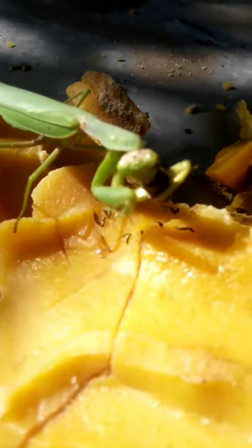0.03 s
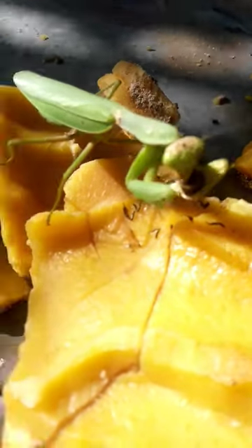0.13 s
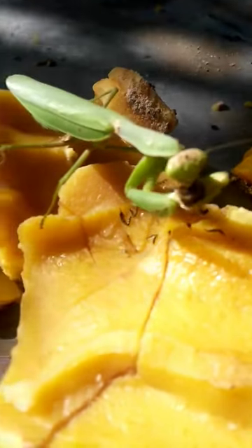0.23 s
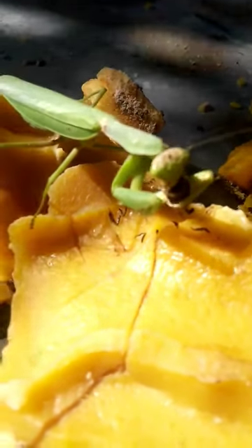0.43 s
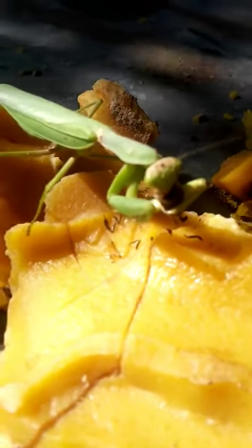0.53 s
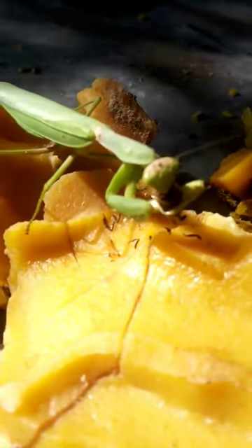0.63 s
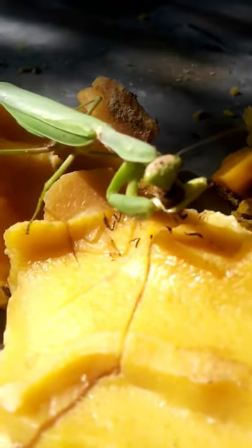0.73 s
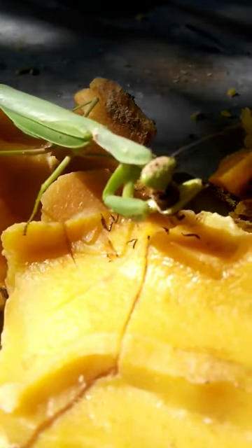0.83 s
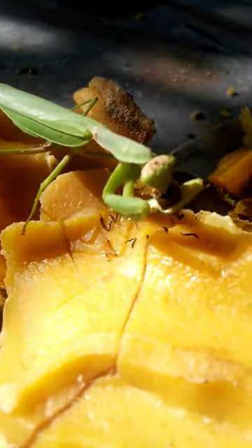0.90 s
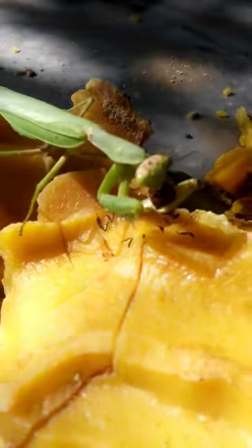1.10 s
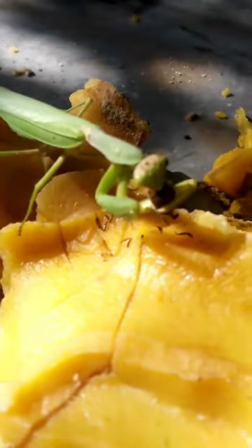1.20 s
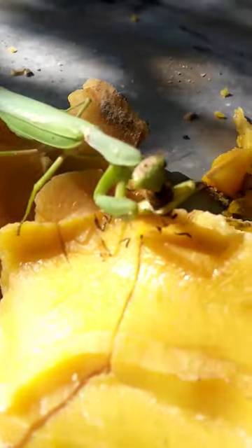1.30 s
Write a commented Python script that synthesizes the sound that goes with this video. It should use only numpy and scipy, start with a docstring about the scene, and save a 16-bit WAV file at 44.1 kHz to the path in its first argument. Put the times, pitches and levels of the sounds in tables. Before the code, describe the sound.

A short, close clack comes from a camera being handled outdoors, just after a soft bump. Faint ticks, a finger's slide and dull rubs of the grip follow, with quiet hiss and rumbling air throughout.

```python
"""A quiet outdoor hiss and a low rumble of moving air are heard from start to end.
At about 0.1 s a hand bumps and rubs softly on the camera it holds.
From 0.21 s three quick blows, close by, make the camera's case ring with a clack.
A finger then slides over the case with a thin hiss and, near 0.4 s, a few tiny ticks.
More soft bumps and rubs of the grip follow until about 1.3 s."""
import sys
import numpy as np
from scipy import signal
from scipy.fft import rfft, irfft
from scipy.io import wavfile

SR = 44100
rng = np.random.default_rng(int(sys.argv[2]) if len(sys.argv) > 2 else 0)


def dump(signal):
    """Clip the signal to [-1, 1] and save it as 16-bit WAV at the path in sys.argv[1]."""
    limited = np.clip(np.atleast_2d(signal).T, -1, 1)
    pcm = np.round(limited * 32767).astype(np.int16)
    wavfile.write(sys.argv[1], SR, pcm)


N = 59535
EDGE_HZ = 14350  # upper edge of the sound


def amp(db):
    """Turns decibels into a gain."""
    return 10 ** (np.asarray(db) / 20)


def unit(x):
    """Scales a signal to an average strength (rms) of 1."""
    return x / np.sqrt(np.mean(x ** 2) + 1e-20)


def read(points, hz):
    """Looks up a frequency in a table, blending between rows on a log scale."""
    f, value = np.transpose(points)
    return np.interp(np.log(hz + 1), np.log(f + 1), value)


def level(points):
    """Gain over time from a (t/s, level/dB) table."""
    return amp(np.interp(np.arange(N) / SR, *np.transpose(points)))


def add(mix, start, sound):
    """Mixes a sound in at a start time in seconds."""
    part = mix[round(start * SR):][:len(sound)]
    part += sound[:len(part)]


def noise(colour, low_hz=4):
    """Noise of rms 1 with the given colour (level at each frequency), fading below low_hz."""
    hz = np.fft.rfftfreq(N, 1 / SR)
    gain = amp(read(colour, hz)) * hz ** 2 / (hz ** 2 + low_hz ** 2)
    return unit(irfft(gain * np.exp(2j * np.pi * rng.random(len(hz))), N))


def coloured(x, colour):
    """Filters a signal by a (f/Hz, level/dB) table."""
    return irfft(rfft(x) * amp(read(colour, np.fft.rfftfreq(N, 1 / SR))), N)


def swell(t, rise, steepness=1.7):
    """Smooth build-up from 0 to 1."""
    return 1 - np.exp(-(t / rise) ** steepness)


# Colour of the outdoor hiss (f/Hz, relative level/dB) and its loudness (t/s, level/dB)
AIR_COLOUR = [(60, -6.5), (110, 2), (240, -6), (500, -10.5), (850, -10), (1300, -16.5), (2000, -16.5),
              (3300, -20), (7000, -24.5), (14000, -26)]
AIR_LEVEL = [(0, -62), (.05, -62), (.2, -61.5), (.5, -64), (.67, -64.5), (.712, -68), (.745, -64.5),
             (.82, -64.5), (.866, -69), (.91, -64), (.99, -67), (1.035, -64.5), (1.075, -67.5),
             (1.13, -63.5), (1.2, -64), (1.35, -66)]
def air():
    """Outdoor hiss whose level dips briefly now and then."""
    return noise(AIR_COLOUR, low_hz=67.4) * level(AIR_LEVEL)


# Colour of the rumble (f/Hz, relative level/dB) and its loudness (t/s, level/dB)
RUMBLE_COLOUR = [(5, 9.5), (18, -8), (40, -10), (80, -18), (160, -41), (400, -70)]
RUMBLE_LEVEL = [(0, -63.5), (.14, -51.5), (.22, -58.5), (.335, -46), (.37, -51.5), (.44, -45), (.52, -58.5),
                (.7, -62.5), (.76, -53), (.87, -62), (1.35, -63)]
def rumble():
    """Moving air makes a low rumble that rises and falls."""
    return noise(RUMBLE_COLOUR) * level(RUMBLE_LEVEL)


# Rubs of the hand (t/s, level/dB, half-length/s) and their colour (f/Hz, relative level/dB)
RUBS = [(0.105, -65, 0.059), (0.47, -63, 0.0041), (0.936, -68, 0.018), (1.031, -68.5, 0.0098),
        (1.14, -70, 0.016)]
RUB_COLOUR = [(100, -6), (250, -4), (550, -4), (900, -4.5), (1400, -13.5), (2200, -13), (5000, -34.5),
              (14000, -35.5)]
def rubs():
    """The grip rubs on the case in faint, dull rustles."""
    t = np.arange(N) / SR
    envelope = sum(amp(db) * np.exp(-((t - centre) / half) ** 2) for centre, db, half in RUBS)
    return noise(RUB_COLOUR) * envelope


# Soft bumps on the case (t/s, level/dB, f/Hz)
BUMPS = [(.088, -54, 482), (.102, -49.5, 120), (0.132, -47, 110), (0.439, -53.5, 125), (1.039, -54, 130),
         (1.131, -62, 330), (1.201, -49.5, 127), (1.219, -55, 104), (1.279, -50, 111)]
def bumps(size=6000, rise_s=.0037, fade_s=.09):
    """Dull knocks of the hand: each is a low tone that drops 60 dB in fade_s."""
    out, t = np.zeros(N), np.arange(size) / SR
    for start, db, hz in BUMPS:
        add(out, start, np.sin(2 * np.pi * hz * t) * swell(t, rise_s) * amp(db - 60 * t / fade_s))
    return out


# Colour of the finger's hiss (f/Hz, relative level/dB) and its loudness (t/s, level/dB)
SLIDE_COLOUR = [(500, -17.5), (4000, -6.5), (6500, -5.5), (10000, -3), (14000, -9)]
SLIDE_LEVEL = [(.28, -110), (.33, -57), (.365, -58), (.388, -48.5), (.405, -48.5), (.413, -55), (.46, -62),
               (.55, -70), (.66, -72), (.72, -110)]
def slide():
    """A finger slides over the case with a thin hiss."""
    return noise(SLIDE_COLOUR) * level(SLIDE_LEVEL)


# Ticks during the slide (t/s, relative level/dB) and their colour (f/Hz, relative level/dB)
TICKS = [(.3837, -17), (.3901, -12), (.3954, 4), (.3958, -7), (.4057, -15)]
TICK_COLOUR = [(200, -26), (2000, -26), (4600, -26), (6300, -2), (8700, 0), (11000, -4), (14000, -7)]
def ticks(size=1024, gain_db=-9, fizz_db=-9, fizz_s=.002):
    """Sharp bright clicks, each with a few milliseconds of fizz."""
    out, t = np.zeros(N), np.arange(size) / SR
    log_gain = np.log(amp(read(TICK_COLOUR, abs(np.fft.fftfreq(size, 1 / SR)))))
    # pack this colour into one short click
    click = np.fft.ifft(np.exp(np.conj(signal.hilbert(log_gain)))).real
    for start, db in TICKS:
        fizz = rng.standard_normal(size) * np.exp(-t / fizz_s)
        push = (t == 0) + amp(fizz_db) * fizz / np.linalg.norm(fizz)
        add(out, start, amp(gain_db + db) * signal.fftconvolve(push, click))
    return out


# Colour of the echo (f/Hz, relative level/dB)
ECHO_COLOUR = [(150, -6), (500, 10.5), (1500, -1.5), (4000, -4.5), (12000, -16.5)]
def echo(blow_db, gain_db=-29.5, rise_s=.045, fade_s=.65):
    """The surroundings answer a blow with a faint wash of noise."""
    t = np.arange(N) / SR
    return noise(ECHO_COLOUR) * swell(t, rise_s) * amp(blow_db + gain_db - 60 * t / fade_s)


# How long the case rings (f/Hz, time to drop 60 dB/s), before stretch multiplies it
RING_TIMES = [(250, 0.23), (1000, 0.21), (2500, 0.11), (6000, 0.13), (12000, 0.1)]
def ringing(t, hz, rise, crest_db, stretch, crest_s=.0058):
    """Loudness of one tone of the case: a build-up, a short crest, then a steady fade."""
    lag = .5 + 3550 / (hz + 3550)  # lower tones build up more slowly
    after = np.maximum(t - rise * lag, 0)
    # the crest lifts all but the bass
    lift_db = crest_db * hz / (hz + 1540) * np.exp(-(after / (crest_s * lag)) ** 2)
    fade_db = 60 * after / (stretch * read(RING_TIMES, hz))
    return swell(t, rise * lag) * amp(lift_db - fade_db)


# Colour of the case's many weak tones (f/Hz, relative level/dB)
CASE_COLOUR = [(90, -27.5), (220, -10.5), (430, -2.5), (680, -7.5), (1000, 0.5), (1450, -4), (1900, 1),
               (3200, 3.5), (4800, -1), (6900, -6.5), (9400, -3), (10600, -13.5), (12200, -6),
               (14000, -25.5)]
def weak_tones(t, rise, crest_db, tint_db, stretch, count=440, uneven_db=1):
    """A blow sets a crowd of weak tones ringing; tint_db shifts their bass, treble and top."""
    place, phase, weakness = rng.random((3, count))
    hz = (np.arange(count) + place) * EDGE_HZ / count
    bass_db, treble_db, top_db = tint_db
    tint = amp(read([(727, bass_db), (2252, 0), (6290, treble_db), (11700, top_db)], hz))
    strength = unit(amp(read(CASE_COLOUR, hz) - uneven_db * (2 * weakness - 1)))
    gain = strength * tint / np.sqrt(count)
    hz = hz[:, None]
    tones = np.sin(2 * np.pi * (hz * t + phase[:, None]))
    return gain @ (ringing(t, hz, rise, crest_db, stretch) * tones)


# The case's strong tones (f/Hz, then relative level/dB in blows 1, 2 and 3)
STRONG_TONES = [(1660, -30, -38, -42), (1836, -27, -38, -34), (1952, -33, -34, -31), (2054, -44, -35, -27),
                (2305, -33, -46, -33), (2604, -31, -28, -30), (2666, -27, -31, -26), (3070, -29, -33, -29),
                (3215, -32, -35, -27), (3332, -34, -32, -32), (3706, -34, -32, -28), (3883, -36, -30, -28),
                (4120, -32, -36, -36), (4680, -34, -32, -40), (5347, -35, -32, -33), (5556, -33, -34, -38),
                (6058, -32, -31, -25), (7350, -31, -37, -46), (8080, -33, -40, -33), (8845, -34, -44, -27),
                (9360, -41, -47, -26), (9690, -35, -44, -27), (12170, -43, -46, -33)]
# Their ring time compared with the weak tones (f/Hz, factor)
STRONG_STRETCH = [(2000, 1.15), (3500, .9), (6000, .8), (10000, .6)]
def strong_tones(t, blow, rise, crest_db, stretch, gain_db=-5.5):
    """Each blow rings the same strong tones of the case in its own proportions."""
    out = np.zeros(len(t))
    for hz, *levels_db in STRONG_TONES:
        tone = np.sin(2 * np.pi * (hz * t + rng.random()))
        envelope = ringing(t, hz, rise, crest_db, read(STRONG_STRETCH, hz) * stretch)
        out += tone * amp(gain_db + levels_db[blow]) * envelope
    return out


# Blows on the case (t/s, base level/dB of weak tones and echo, base rise/s, base crest/dB,
# bass/dB, treble/dB, top/dB, ring time factor, relative side level/dB)
BLOWS = [(.2112, -24, .005, 8, 5, -0.5, -1.5, 1, -49.5), (.2442, -24, 0.0045, 7, -1.5, -2, -4, 1.3, -53),
         (.2622, -21, .0042, 10, 0, -3, 3, 0.91, 0)]
# Filter for the clacks' difference between the ears (f/Hz, level/dB)
CLACK_WIDTH = [(400, -72), (1300, -27.5), (3800, -28.5), (6500, -41), (8800, -6), (10500, -21),
               (13000, -11.5)]
def clacks(size=7000, side_delay_s=.009):
    """Three blows ring the case. Gives mid (what both ears share) and side (how they differ)."""
    mid, side = np.zeros((2, N))
    t = np.arange(size) / SR
    for blow, (start, db, rise, crest_db, *tint_db, stretch, side_db) in enumerate(BLOWS):
        clack = amp(db) * weak_tones(t, rise, crest_db, tint_db, stretch)
        clack += strong_tones(t, blow, rise, crest_db, stretch)
        add(mid, start, clack)
        add(mid, start, echo(db))
        # the first two blows sound centred; the third has slight, delayed stereo width in the treble
        add(side, start + side_delay_s, amp(side_db) * clack)
    return mid, coloured(side, CLACK_WIDTH)


# Filter for the hisses' difference between the ears (f/Hz, level/dB)
HISS_WIDTH = [(200, -47.5), (3600, -47), (5000, -15.5), (8100, -3), (14000, -3.5)]
def scene():
    """Mixes left and right: nearly alike, with a little width in the high treble."""
    clack_mid, clack_side = clacks()
    mid = clack_mid + ticks() + bumps() + rubs() + air() + slide() + rumble()
    side = clack_side + coloured(air() + slide(), HISS_WIDTH)
    return np.array([mid + side, mid - side])


def record(dry):
    """Cuts away the treble above EDGE_HZ."""
    low_pass = signal.firwin(301, EDGE_HZ, window=("kaiser", 8), fs=SR)
    return signal.oaconvolve(dry, low_pass[None], "same")


dry = scene()
out = record(dry)
dump(out)
```